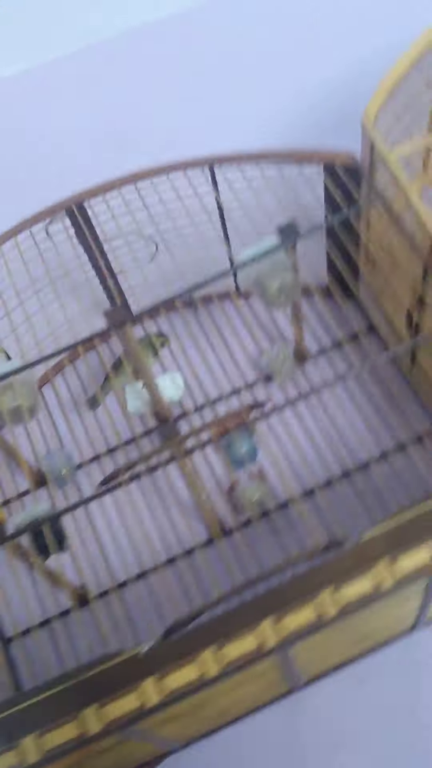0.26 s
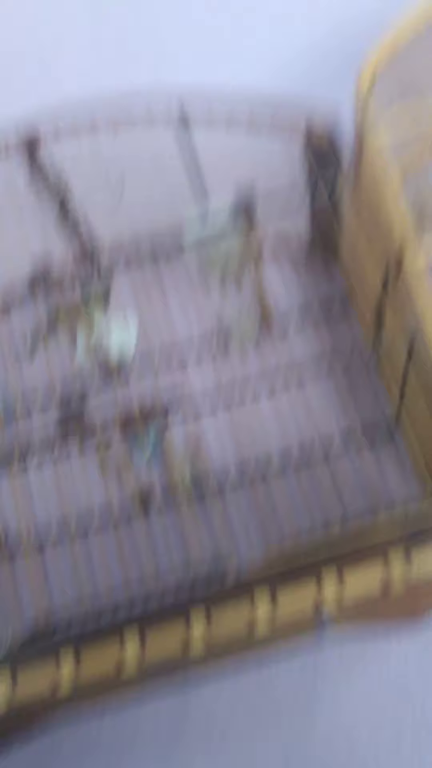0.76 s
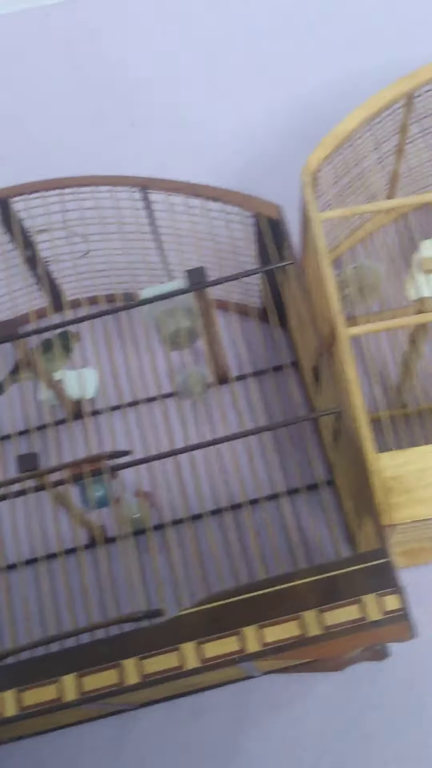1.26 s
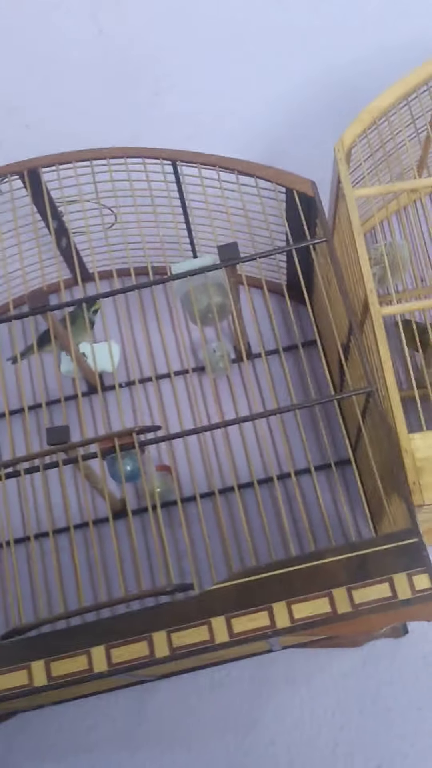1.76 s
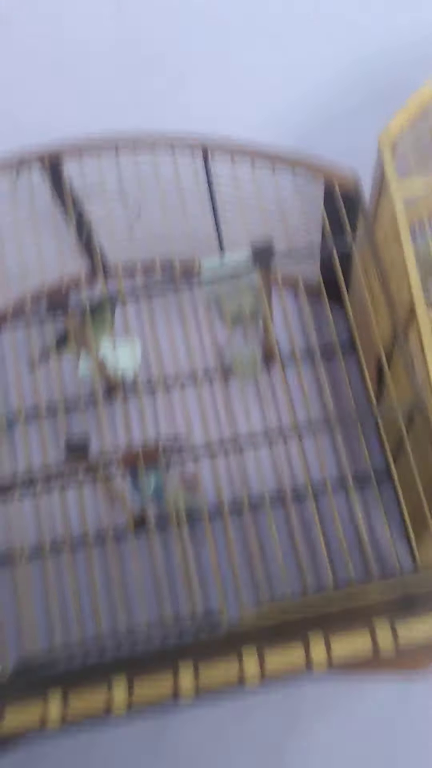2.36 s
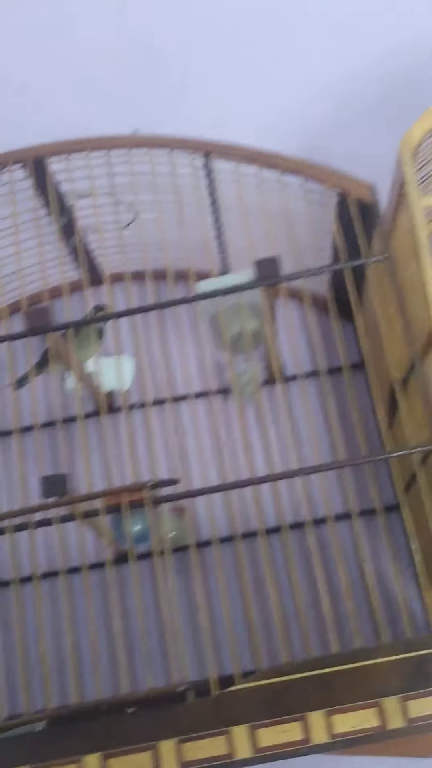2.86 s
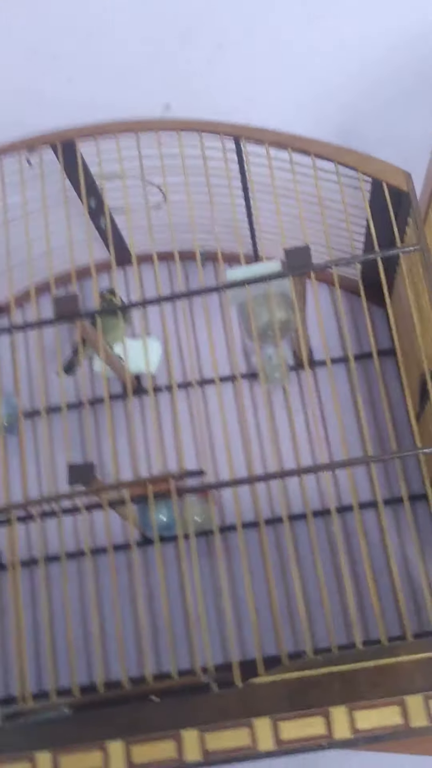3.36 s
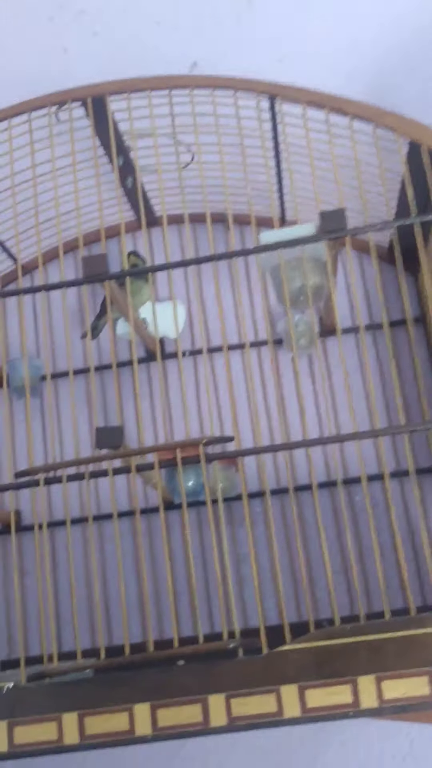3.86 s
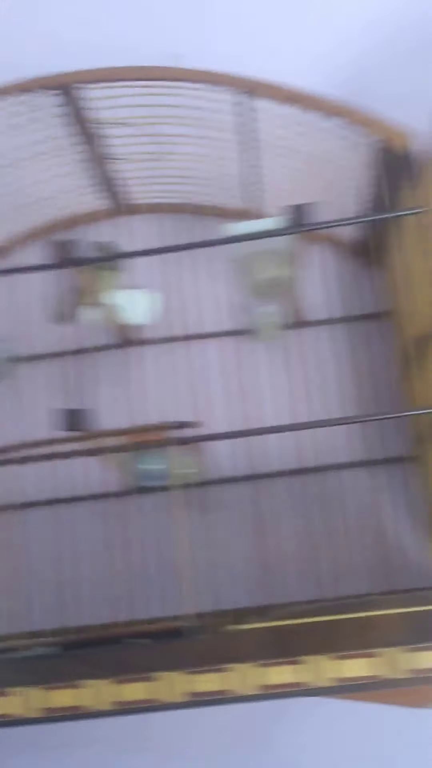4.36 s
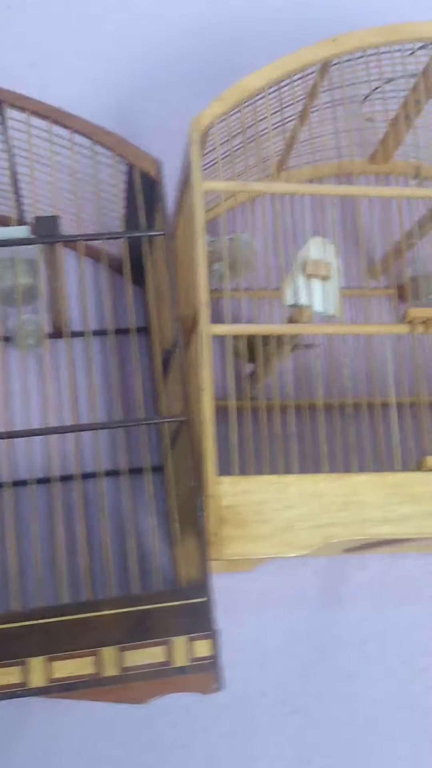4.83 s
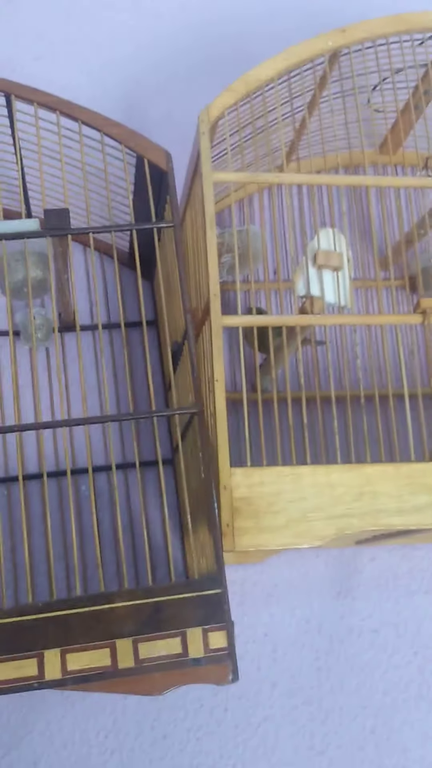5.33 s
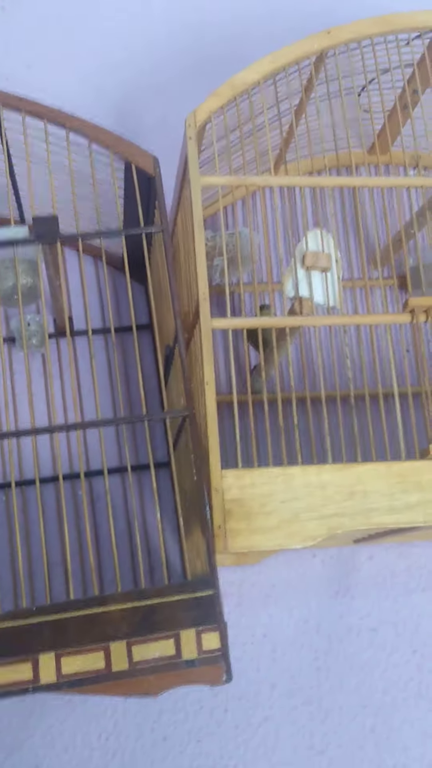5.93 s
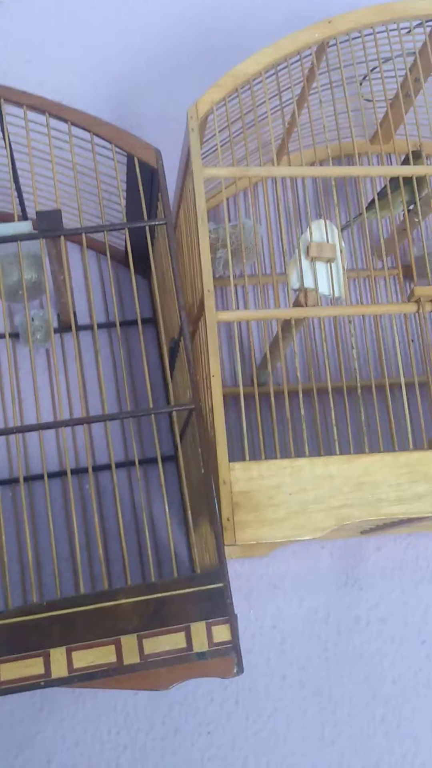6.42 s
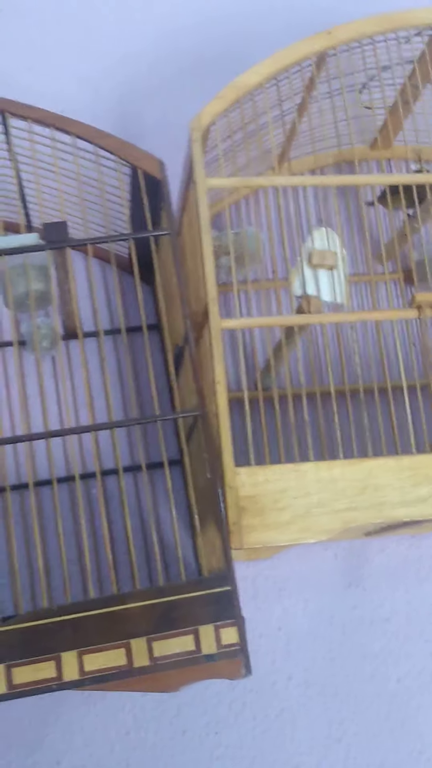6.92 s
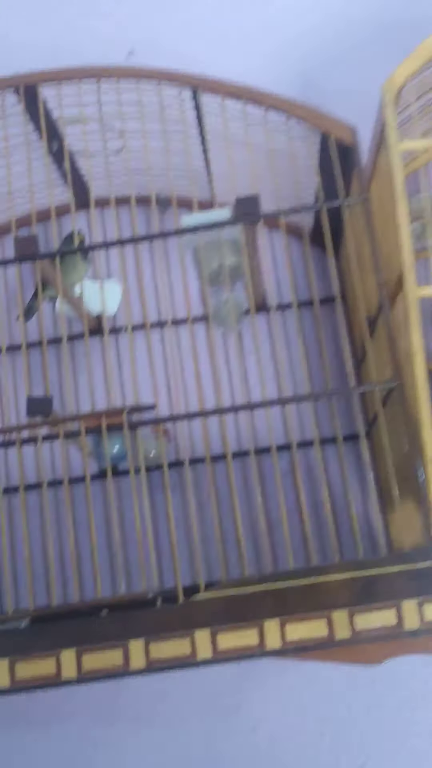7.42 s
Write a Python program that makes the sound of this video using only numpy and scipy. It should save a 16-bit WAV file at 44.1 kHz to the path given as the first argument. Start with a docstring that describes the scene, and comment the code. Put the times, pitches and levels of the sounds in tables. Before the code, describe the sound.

Close in a bare, echoing room, claws tick lightly on cane cage bars while another bird gives faint nasal calls farther off. A finch then sings one rapid, bright phrase of sliding whistles lasting about a second. Scratches and a strong cluster of perch knocks follow, then a neighbour's brief wing flutter with a puff of air. A soft rush rises at the end over low handling rumble and faint hiss.

```python
"""Caged finch song in a bare room

A finch sings one fast phrase of slurred whistles: warbled sine partials with breath noise, in an echoing room.
Claws and beaks tick and scrape on cane (short noise drags); landing feet knock perches (decaying modes).
A neighbour flutters (noise pulsed at the wingbeat, plus draught); another bird calls farther off (harmonic arches).
Behind: faint wavering tones, a soft rush, rustles, the rumble of the hand and room hiss (all shaped noise but
the tones). Two close microphone ports overdrive on loud notes; a suppressor turns down the quiet bands.
"""
import sys
import numpy as np
from scipy import signal
from scipy.fft import rfft, irfft, next_fast_len
from scipy.io import wavfile
from scipy.ndimage import uniform_filter1d, map_coordinates

SR = 44100
rng = np.random.default_rng(int(sys.argv[2]) if len(sys.argv) > 2 else 0)


def store_wav(level_fs):
    """Save 16-bit WAV to argv[1]."""
    pcm = np.round(np.clip(np.atleast_2d(level_fs), -1, 1) * 32767)
    wavfile.write(sys.argv[1], SR, pcm.T.astype(np.int16))


N = 339019
T = np.arange(N) / SR


def amp(db):
    """dB to gain."""
    return 10 ** (np.asarray(db) / 20)


def unit(x):
    """Scaled to rms 1."""
    return x / np.sqrt(np.mean(x ** 2) + 1e-20)


def along(points, hz):
    """(frequency [Hz], value) points read on a log frequency axis."""
    f, v = np.transpose(points)
    return np.interp(np.log(hz + 1), np.log(f + 1), v)


def wobble(rate_hz, size=N):
    """Smooth random curve with rate_hz knots a second."""
    knots = rng.standard_normal(int(size * rate_hz / SR) + 4)
    return map_coordinates(knots, [np.arange(size) * rate_hz / SR])


def swells(rows, rest_db, rise_db_per_s, fall_db_per_s):
    """Level that rests, climbs to each (time [s], hold [s], level [dB]), holds and sinks back."""
    peaks = []
    for s, hold_s, db in rows:
        before_s = np.maximum(s - T, 0)
        after_s = np.maximum(T - s - hold_s, 0)
        peaks.append(db - rise_db_per_s * before_s - fall_db_per_s * after_s)
    return np.maximum(np.max(peaks, axis=0), rest_db)


def coloured(x, spectrum):
    """x through a (frequency [Hz], gain [dB]) spectrum, silent beyond its ends."""
    n = x.shape[-1]
    m = next_fast_len(n + 4096)
    closed = [(spectrum[0][0] / 2, -120), *spectrum, (spectrum[-1][0] * 2, -120)]
    gain = amp(along(closed, np.fft.rfftfreq(m, 1 / SR)))
    return irfft(rfft(x, m) * gain, m)[..., :n]


# left-right likeness of diffuse sound: (frequency [Hz], correlation [-1..1])
LIKENESS = [(60, 0.64), (250, 1), (600, 0.31), (1200, 0.12), (2500, -0.052), (8000, 0.15)]


def diffuse(size):
    """White noise from all sides: alike at both ports in the bass, nearly unrelated in the treble."""
    correlation = np.clip(along(LIKENESS, np.fft.rfftfreq(size, 1 / SR)), -1, 1)
    turn = np.arccos(correlation) / 2
    white = rfft(rng.standard_normal((2, size)))
    mid, side = irfft(white * [np.cos(turn), np.sin(turn)], size)
    return np.array([mid + side, mid - side])


def patchy(x, depth_db):
    """x with random patches of gain, a few hundred Hz wide and some 40 ms long."""
    z = signal.stft(x, nperseg=512)[2]
    field = uniform_filter1d(rng.standard_normal(z.shape[1:]), size=3, axis=0)
    field = uniform_filter1d(field, size=7, axis=1)
    return signal.istft(z * amp(depth_db * unit(field)), nperseg=512)[1][:, :N]


# reverberation: (frequency [Hz], t60 [s])
WALLS = [(200, 0.36), (1500, 0.31), (4000, 0.33), (12000, 0.28)]


def room(x, wet_db, lag=0):
    """Direct sound, lag samples later at left (negative: right), and a fresh tail decaying per frequency."""
    hz, t, z = signal.stft(diffuse(SR // 2), SR, nperseg=256)
    decay = amp(-60 * t / along(WALLS, hz)[:, None])
    tail = signal.istft(z * decay, SR, nperseg=256)[1]
    fade_in = np.clip(np.arange(tail.shape[1]) / (0.0047 * SR), 0, 1)
    tail *= amp(wet_db) / np.linalg.norm(tail[0]) * fade_in
    tail[[0, 1], [max(lag, 0), max(-lag, 0)]] = 1  # direct sound
    return signal.fftconvolve(x[None], tail, axes=1)


def add(mix, sound, s):
    """Lays sound into mix from s seconds."""
    part = mix[:, max(round(s * SR), 0):][:, :sound.shape[1]]
    part += sound[:, :part.shape[1]]


STILL_DB = -78
# room hiss: (frequency [Hz], relative level [dB per Hz])
STILL_SPECTRUM = [(15, -24.5), (25, 4), (2610, -11), (3920, -6.5), (4490, -32), (7920, -17), (14400, -34),
                  (16000, -32.5)]


def still_room():
    """Steady, faintly patchy noise of the still room."""
    return unit(coloured(patchy(diffuse(N), depth_db=2.5), STILL_SPECTRUM)) * amp(STILL_DB)


HAND_REST_DB = -82
# small jolts of the hand: (time [s], hold [s], level [dB])
HAND_JOLTS = [(.97, 0.0046, -71.5), (2.2, 0, -62), (2.42, 0, -63.5), (2.62, 0, -62), (4.61, 0.042, -70),
              (4.74, 0.16, -54), (5.28, 0, -69), (5.44, 0.0466, -72), (7.07, .05, -71)]
# hand rumble: (frequency [Hz], relative level [dB per Hz])
RUMBLE_SPECTRUM = [(25, -14.5), (62, 5.5), (95, -6.5), (125, -18), (165, -6), (260, -29.5)]


def hand_rumble():
    """Low noise from the holding hand, swelling at each jolt."""
    db = swells(HAND_JOLTS, HAND_REST_DB, rise_db_per_s=134.5, fall_db_per_s=110)
    return unit(coloured(diffuse(N), RUMBLE_SPECTRUM)) * amp(db)


# level of the far rush: (time [s], level [dB])
RUSH_LEVEL = [(0, -63.5), (.3, -76.5), (.6, -100), (1.3, -84.5), (5.2, -91), (5.9, -73), (6.65, -67.5),
              (7.25, -60), (7.69, -61.5)]
# far rush: (frequency [Hz], relative level [dB per Hz])
RUSH_SPECTRUM = [(240, -56), (400, -29.5), (617, 0.5), (865, -3), (1670, 4.5), (2860, -7), (5000, -19.5),
                 (6500, -49.5), (11000, -120)]


def far_rush():
    """Soft patchy mid-band noise on a slow level curve, slightly unsteady."""
    s, level_db = np.transpose(RUSH_LEVEL)
    db = np.interp(T, s, level_db) + 1.3 * wobble(40)
    return unit(coloured(patchy(diffuse(N), depth_db=3), RUSH_SPECTRUM)) * amp(db)


RUSTLE_REST_DB = -82
# rustles near the cages: (time [s], hold [s], level [dB])
RUSTLES = [(.03, 0.41, -64.5), (.74, .12, -67.5), (1.01, 0.056, -53.5), (1.14, 0.12, -66.5),
           (1.35, 0.36, -72.5), (1.96, 0.011, -52), (3.25, 0.0097, -58.5), (6.36, 0.063, -61),
           (6.95, 0.09, -67.5), (7.05, 0.089, -60.5), (7.25, 0.22, -64), (7.42, 0.11, -59)]
# rustle: (frequency [Hz], relative level [dB per Hz])
RUSTLE_SPECTRUM = [(2650, -37), (4500, -10.5), (11300, 0), (14700, -12), (16000, -25.5)]


def rustle():
    """Fine treble noise that swells at each rustle."""
    db = swells(RUSTLES, RUSTLE_REST_DB, rise_db_per_s=247.5, fall_db_per_s=114.5)
    return unit(coloured(patchy(diffuse(N), depth_db=1.5), RUSTLE_SPECTRUM)) * amp(db)


TONE_SECOND_DB = -16.5
# faint wavering tones: (time [s], length [s], mean pitch [Hz], mean level [dB])
FAINT_TONES = [(0.049, 0.17, 1090, -64), (0.141, 0.17, 284.8, -65), (1.249, 0.47, 2433, -77.5),
               (1.355, 0.27, 706, -82), (1.748, 0.048, 459, -76), (4.045, 0.65, 3256, -79),
               (4.127, 0.19, 8900, -71), (4.203, .21, 1119, -68.5), (4.234, 0.049, 1593, -79),
               (4.243, .14, 2350, -86), (4.13, 0.044, 567, -72), (4.266, 0.16, 749, -68),
               (4.247, 0.29, 4200, -80.5), (4.276, 0.063, 300, -68), (5.71, 0.05, 647, -79)]


def faint_tones():
    """Sines with a weak second harmonic that swell, waver and fade, heard mostly through the room."""
    mix = np.zeros((2, N))
    for s, length_s, hz, db in FAINT_TONES:
        u = np.arange(round(length_s * SR)) / (length_s * SR)
        phase = 2 * np.pi * hz * np.cumsum(1 + 0.025 * wobble(65, size=len(u))) / SR
        swell = np.sqrt(np.sin(np.pi * u)) * amp(db + 4 * wobble(45, size=len(u)))
        tone = np.sin(phase) + amp(TONE_SECOND_DB) * np.sin(2 * phase)
        add(mix, room(swell * tone, wet_db=3), s)
    return mix


def voice(notes, overtones, warble_hz, ragged, breath_db, wet_db, lag):
    """Syrinx: partials follow the pitch, shaken by an uneven warble, roughened by turbulent air."""
    mix = np.zeros((2, N))
    for depth_hz, note in notes:
        s, hz, db = np.transpose(note)
        t = np.arange(max(s[0], 0), s[-1], 1 / SR)
        shake = np.sin(2 * np.pi * warble_hz * t + ragged * wobble(60, size=len(t)))
        pitch_hz = np.interp(t, s, hz) + depth_hz * shake
        phase = 2 * np.pi * np.cumsum(pitch_hz) / SR
        edge = np.clip(np.minimum(t - s[0], s[-1] - t) / 0.0024, 0, 1)
        tone = sum(amp(level) * np.sin(k * phase) for k, level in overtones if k * hz.max() < SR / 2)
        tone *= 1 + amp(breath_db) * wobble(1800, size=len(t))
        whistle = np.sqrt(2) * tone * edge * amp(np.interp(t, s, db))
        add(mix, room(whistle, wet_db, lag), s[0])
    return mix


CALL_SWELL, CALL_CREST = .33, .65  # shares of the length: full voice, top of the arch
CALL_EARLY_RISE = .65  # share of the pitch rise done at full voice
CALL_ONSET_DB, CALL_END_DB, CALL_WAVER_DEPTH_HZ = -13, -12, 45.5
# far nasal calls: (time [s], length [s], first [Hz], top [Hz], last [Hz], peak before overtone gains [dB])
FAR_CALLS = [(-.08, .37, 1825, 1991, 1660, -69.5), (1.108, 0.3, 1725, 2017, 1818, -69),
             (3.467, .39, 1865, 1987, 1790, -70)]
# partials of a call: (multiple, gain [dB])
CALL_OVERTONES = [(1, 5.5), (2, 4.5), (3, -8), (4, -7.5)]


def far_calls():
    """Another bird's nasal arches, strong in the second harmonic: each swells rising, crests, drops away."""
    notes = []
    for s, length_s, first, top, last, db in FAR_CALLS:
        early_hz = first + CALL_EARLY_RISE * (top - first)
        arch = [(s, first, db + CALL_ONSET_DB),
                (s + CALL_SWELL * length_s, early_hz, db),
                (s + CALL_CREST * length_s, top, db),
                (s + length_s, last, db + CALL_END_DB)]
        notes.append((CALL_WAVER_DEPTH_HZ, arch))
    return voice(notes, CALL_OVERTONES, warble_hz=45, ragged=2.53, breath_db=-61, wet_db=9.5, lag=12)


FLIGHT_S, WINGBEATS_PER_S, WING_GUSTS_DB, STROKE_FADE_DB = 5.979, 22.3, 2.5, 9.2
WING_PEAK_DB, WING_PEAK_S, WING_RISE_DB_PER_S, WING_FADE_DB_PER_S = -34.5, 6.067, 51, 95
# feather swish: (frequency [Hz], relative level [dB per Hz])
FEATHER_SPECTRUM = [(24, -46), (40, -24), (85, -16), (124, -18), (209, -9.5), (810, -2.5), (1180, -8.5),
                    (1760, -2), (3380, -19), (9450, -18.5), (16000, -27)]
# air pushed at the ports: (time [s], hold [s], level [dB])
DRAUGHTS = [(6.1, 0.19, -45.5), (6.42, 0.012, -57.5)]
# draught: (frequency [Hz], relative level [dB per Hz])
PUFF_SPECTRUM = [(40, -21), (70, 4), (100, -2), (125, -25.5), (200, -0.5), (400, -16.5)]


def flutter():
    """Feathers slap at the start of each downstroke, fade through it and push air at the microphone."""
    db = swells([(WING_PEAK_S, .02, WING_PEAK_DB)], -120, WING_RISE_DB_PER_S, WING_FADE_DB_PER_S)
    stroke = (T - FLIGHT_S) * WINGBEATS_PER_S % 1
    beat_db = db - STROKE_FADE_DB * stroke + WING_GUSTS_DB * wobble(150)
    swish = unit(coloured(rng.standard_normal(N), FEATHER_SPECTRUM)) * amp(beat_db) * (T > FLIGHT_S)
    draught_db = swells(DRAUGHTS, -120, rise_db_per_s=214, fall_db_per_s=252)
    draught = unit(coloured(diffuse(N), PUFF_SPECTRUM)) * amp(draught_db)
    return room(swish, wet_db=3, lag=-13)[:, :N] + draught


CONTACT_T = np.arange(SR // 5) / SR
CONTACT_LEAD_S = .003  # drags start this far ahead of the listed times
SCRAPE_TRIM_DB, RATTLE_TRIM_DB, KNOCK_TRIM_DB = -11.5, 2, -4.5  # added to the listed levels
# dry scratch: (frequency [Hz], relative level [dB per Hz])
SCRAPE_SPECTRUM = [(1180, -35.5), (2000, -20), (4230, -5), (4770, -7), (11300, 0), (16000, -10)]
# cane bars: (frequency [Hz], relative level [dB per Hz])
RATTLE_SPECTRUM = [(1300, -34), (1650, -6), (2200, 0), (2900, -8), (4400, -15), (6500, -30)]


def touch(scrape_db, rattle_db, drag_s):
    """A claw's drag envelope, peaking at drag_s, and its gritty scrape plus the cane bars it shakes."""
    drag = CONTACT_T / drag_s * np.exp(1 - CONTACT_T / drag_s)
    grit = rng.standard_normal((2, len(CONTACT_T)))
    scrape = drag * unit(coloured(grit[0], SCRAPE_SPECTRUM)) * amp(scrape_db + SCRAPE_TRIM_DB)
    rattle = coloured(drag * grit[1], RATTLE_SPECTRUM)
    rattle *= amp(rattle_db + RATTLE_TRIM_DB) / np.abs(rattle).max()
    return drag, scrape + rattle


SCRATCH_DRAG_S, SCRATCH_RATTLE_DB = 0.0043, -29  # rattle relative to scrape, before trims
# claws and beaks on the bars: (time [s], level before trim [dB])
SCRATCHES = [(.2705, -49.5), (.399, -40.5), (.5397, -56), (.7272, -61), (.83, -55.5), (.8842, -37),
             (1.0014, -45.5), (1.1184, -45.5), (1.9619, -36), (3.9184, -41), (3.946, -30.5), (4.6653, -48),
             (5.228, -36.5), (5.5667, -41), (5.7663, -46)]


def scratches():
    """Claws and beaks drag briefly over the cane."""
    mix = np.zeros((2, N))
    for s, db in SCRATCHES:
        _, bars = touch(db, db + SCRATCH_RATTLE_DB, SCRATCH_DRAG_S)
        add(mix, room(bars, wet_db=9.5, lag=-2), s - CONTACT_LEAD_S)
    return mix


KNOCK_DRAG_S, MODE_SPREAD_DB, MODE_FALL_DB_PER_OCTAVE = .0045, 2.8, 18.4
# feet on the perches: (time [s], scrape [dB], rattle [dB], knock [dB], knock pitch [Hz]), levels before trim
KNOCKS = [(1.5473, -46.5, -67, -63, 198), (2.944, -30, -49.5, -45.5, 245), (3.0759, -36.5, -58, -56.5, 363),
          (4.1178, -87, -94, -56, 380), (4.2651, -76, -88, -54.5, 390), (4.3661, -71.5, -85, -51.5, 668),
          (4.558, -49.5, -47, -58, 1250), (4.592, -45.5, -55, -44, 1040), (4.711, -17, -28.5, -20, 480),
          (4.815, -24, -33.5, -29.5, 1310), (4.9156, -37, -47.5, -41.5, 590), (5.359, -58.5, -47, -56, 474),
          (6.332, -49, -63, -46.5, 201), (7.1784, -50, -55, -43.5, 800)]
# perch modes: (frequency [Hz], t60 [s])
PERCH_MODES = [(200, 0.044), (305, 0.036), (430, 0.013), (550, 0.031), (670, 0.039), (780, 0.022),
               (980, 0.063), (1120, 0.039), (1400, .02)]


def knocks():
    """A landing foot scratches and rattles the cane and rings the perch's modes."""
    mix = np.zeros((2, N))
    for s, scrape_db, rattle_db, knock_db, knock_hz in KNOCKS:
        drag, bars = touch(scrape_db, rattle_db, KNOCK_DRAG_S)
        wood = np.zeros(len(CONTACT_T))
        for hz, t60_s in PERCH_MODES:
            # modes near the knock pitch ring loudest
            mode_db = rng.normal(0, MODE_SPREAD_DB) - MODE_FALL_DB_PER_OCTAVE * abs(np.log2(hz / knock_hz))
            wood += amp(mode_db - 60 * CONTACT_T / t60_s) * np.sin(2 * np.pi * hz * CONTACT_T)
        # a soft, uneven foot
        push = np.diff(drag * uniform_filter1d(rng.standard_normal(len(CONTACT_T)), size=14))
        knock = signal.fftconvolve(push, wood)[:len(CONTACT_T)]
        knock *= amp(knock_db + KNOCK_TRIM_DB) / np.abs(knock).max()
        add(mix, room(bars + knock, wet_db=9, lag=-7), s - CONTACT_LEAD_S)
    return mix


NOTE_ONSET_DB, NOTE_SAG_DB_PER_S, NOTE_RELEASE_S, NOTE_RELEASE_DB = -18, -52.5, 0.0073, -10
# notes: (peak before overtone gains [dB], time to peak [s], warble depth [Hz], path of (time [s], pitch [Hz]))
SONG = [ (-47, 0.016, 20, [(1.835, 3810), (1.88, 4100), (1.915, 3760)]), (-38, 0.048, 30, [(1.918, 4746),
        (1.95, 4705), (1.975, 4400), (2.04, 4367)]), (-37, 0.026, 20, [(2.134, 4010), (2.16, 4117),
        (2.178, 3960)]), (-38, .035, 60, [(2.16, 3500), (2.195, 3980), (2.228, 3986)]),
        (-30.5, .055, 90, [(2.21, 5300), (2.232, 5450), (2.265, 5130), (2.3, 4865), (2.355, 4956)]),
        (-29, 0.031, 270, [(2.383, 3500), (2.43, 3805), (2.455, 3850)]), (-23.5, 0.033, 90, [(2.445, 6350),
        (2.465, 5570), (2.495, 4603), (2.555, 3507), (2.61, 3413)]), (-22, .018, 540, [(2.643, 6400),
        (2.652, 6600), (2.665, 6200), (2.698, 5676)]), (-24, 0.017, 25, [(2.685, 4320), (2.712, 4080),
        (2.73, 3953), (2.75, 3295), (2.77, 3290), (2.805, 3000)]), (-26.5, 0.022, 60, [(2.855, 4636),
        (2.88, 4797), (2.898, 4675), (2.915, 3966), (2.965, 2890)]), ]
# partials of the song: (multiple, gain [dB])
SONG_OVERTONES = [(1, 3.5), (2, -18), (3, -24)]


def song():
    """The finch's slurred whistles: each climbs to its peak, sags while the pitch slides and lets go."""
    notes = []
    for db, attack_s, depth_hz, path in SONG:
        s, hz = np.transpose(path)
        peak, let_go = s[0] + attack_s, s[-1] - NOTE_RELEASE_S
        held_db = db + NOTE_SAG_DB_PER_S * (let_go - peak)
        at = np.sort([*s, peak, let_go])
        corners_db = [db + NOTE_ONSET_DB, db, held_db, held_db + NOTE_RELEASE_DB]
        level_db = np.interp(at, [s[0], peak, let_go, s[-1]], corners_db)
        notes.append((depth_hz, np.transpose([at, np.interp(at, s, hz), level_db])))
    return voice(notes, SONG_OVERTONES, warble_hz=166.2, ragged=1, breath_db=-39, wet_db=3.5, lag=-8)


def scene():
    """Everything that reaches the two microphone ports."""
    background = still_room() + hand_rumble() + far_rush() + rustle()
    far = faint_tones() + far_calls()
    near = flutter() + scratches() + knocks() + song()
    return background + far + near


TOP_HZ, MAX_CUT_DB = 15830, -8
# capsule sum and difference tones: (frequency [Hz], strength [dB])
OVERDRIVE = [(60, -42), (2000, -48), (6500, -13), (12000, 2)]
# suppressor threshold: (frequency [Hz], level [dB per band])
GATE = [(100, -120), (1000, -104), (8000, -102)]
# left port against right: (frequency [Hz], level [dB])
LEAN = [(100, 0), (900, -2.5), (2500, -0.5), (8000, 0.5)]


def record(dry):
    """Squared overdrive, a suppressor that turns down bands near or under threshold, port balance, band limit."""
    hot = dry + coloured(dry ** 2, OVERDRIVE)
    hz, _, z = signal.stft(hot, SR, nperseg=512)
    power = uniform_filter1d(np.mean(np.abs(z) ** 2, 0), size=5, axis=0)
    power = np.abs(uniform_filter1d(power, size=5, axis=1))
    threshold = amp(2 * along(GATE, hz))[:, None]  # as power
    gain = np.maximum(power / (power + threshold), amp(MAX_CUT_DB))
    lean = amp(np.outer([.5, -.5], along(LEAN, hz)))[:, :, None]
    quiet = signal.istft(z * gain * lean, SR, nperseg=512)[1][:, :N]
    return irfft(rfft(quiet) * (np.fft.rfftfreq(N, 1 / SR) < TOP_HZ), N)


dry = scene()
out = record(dry)
store_wav(out)
```